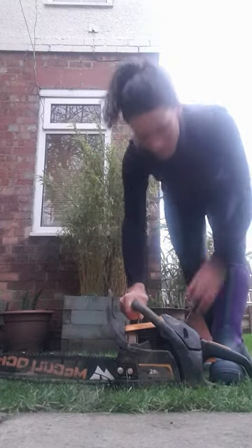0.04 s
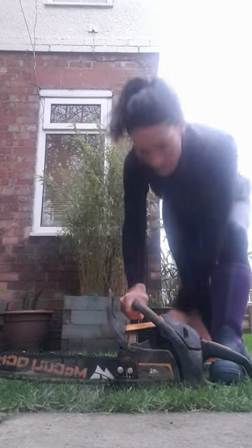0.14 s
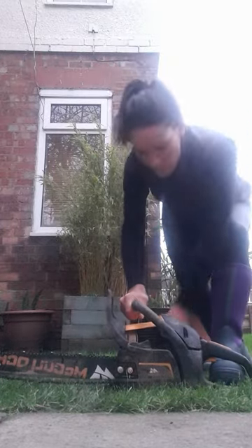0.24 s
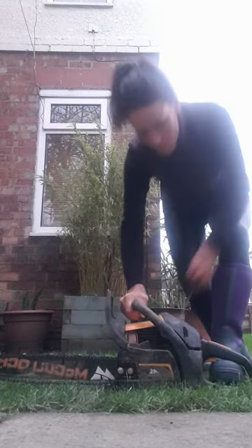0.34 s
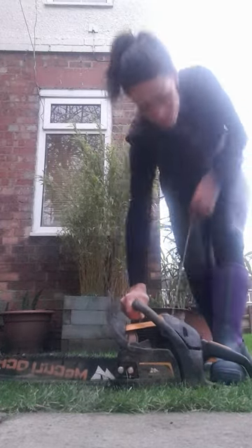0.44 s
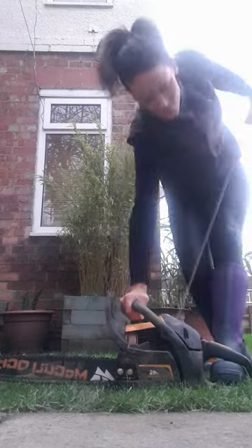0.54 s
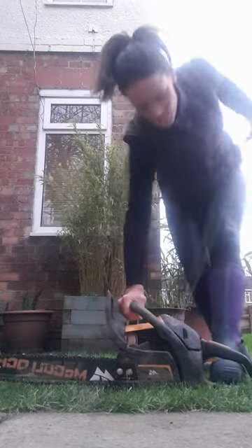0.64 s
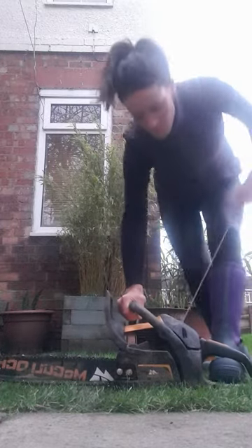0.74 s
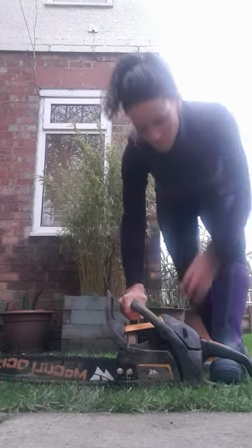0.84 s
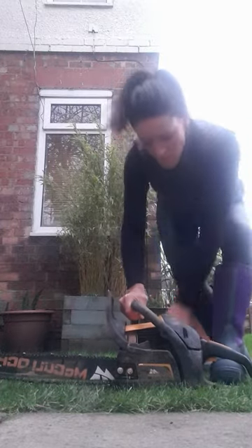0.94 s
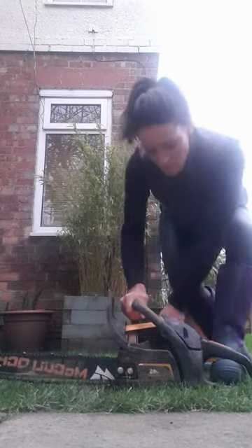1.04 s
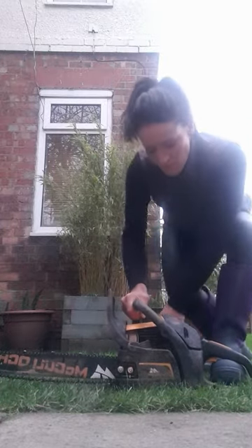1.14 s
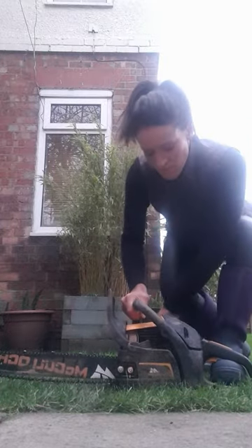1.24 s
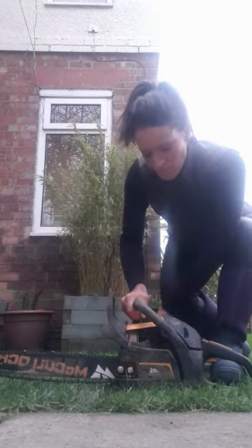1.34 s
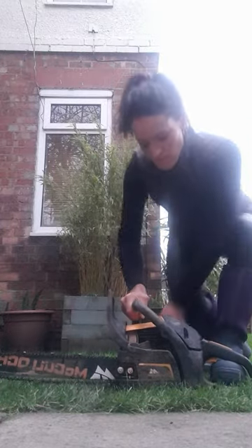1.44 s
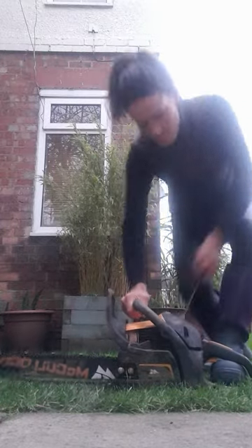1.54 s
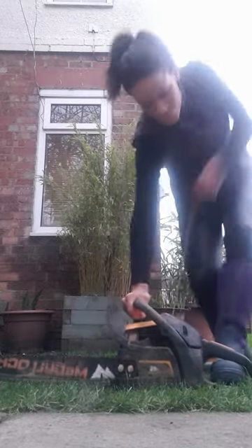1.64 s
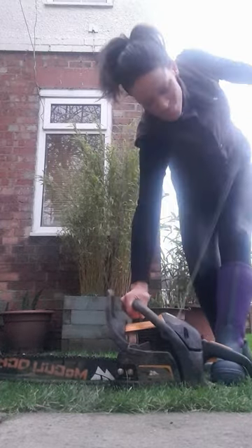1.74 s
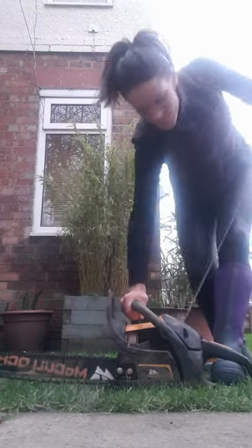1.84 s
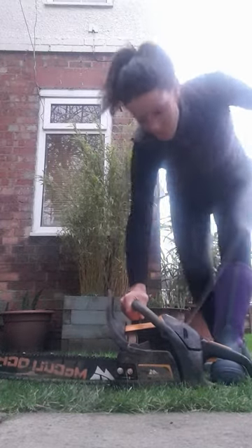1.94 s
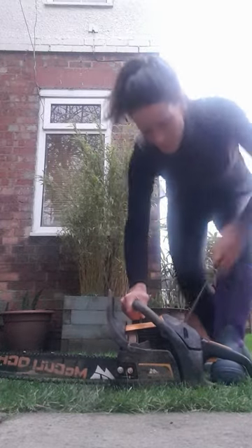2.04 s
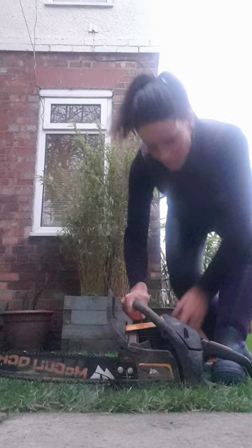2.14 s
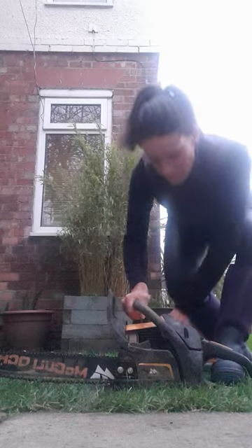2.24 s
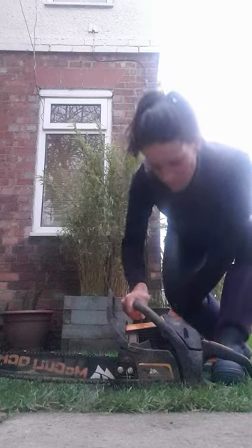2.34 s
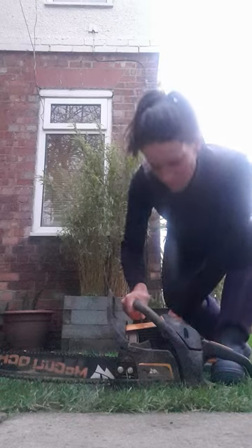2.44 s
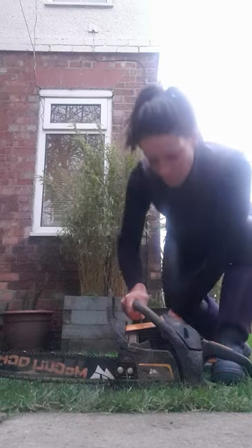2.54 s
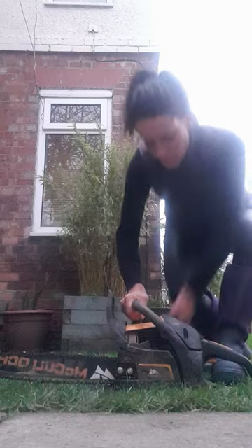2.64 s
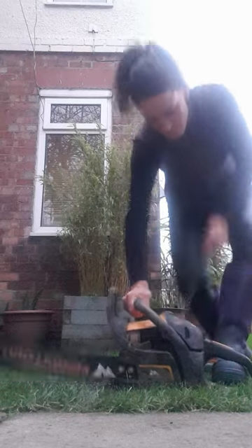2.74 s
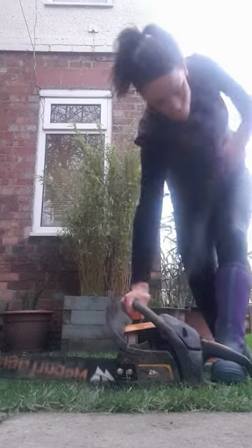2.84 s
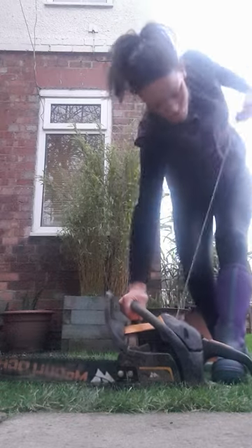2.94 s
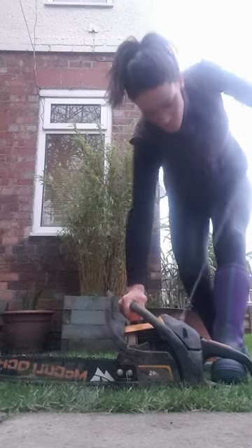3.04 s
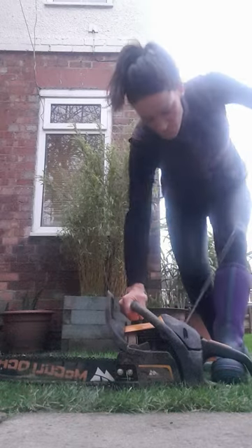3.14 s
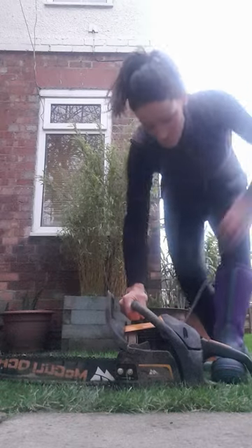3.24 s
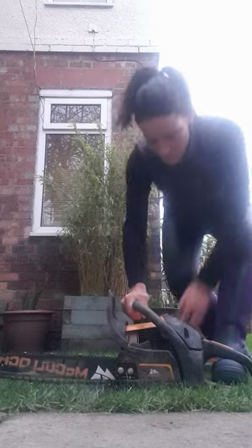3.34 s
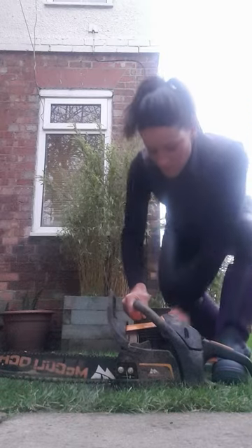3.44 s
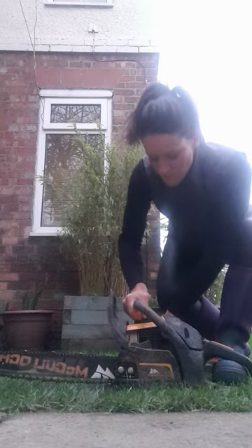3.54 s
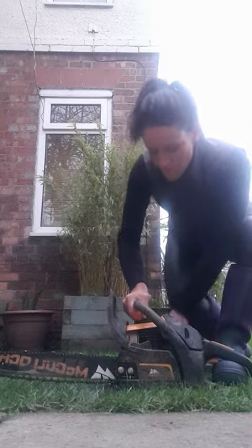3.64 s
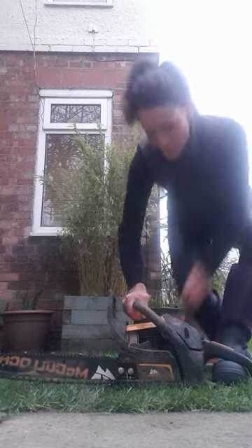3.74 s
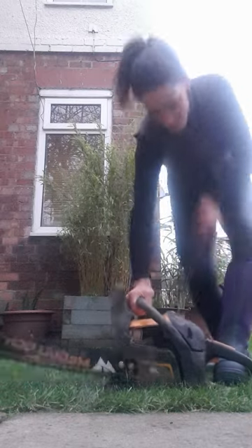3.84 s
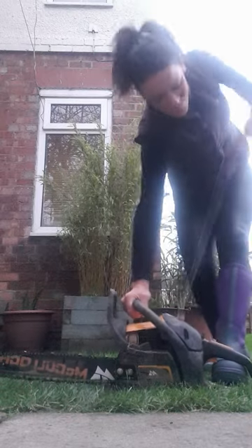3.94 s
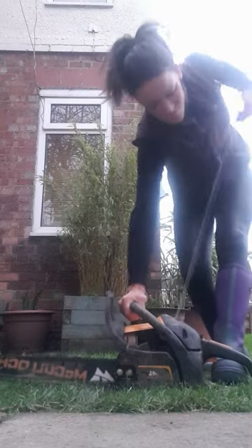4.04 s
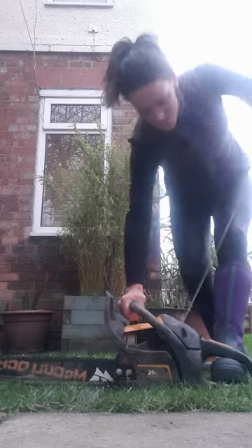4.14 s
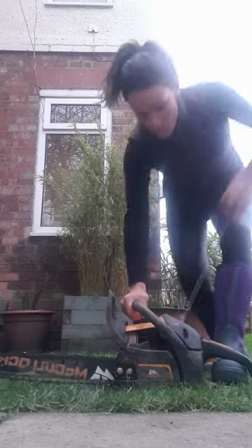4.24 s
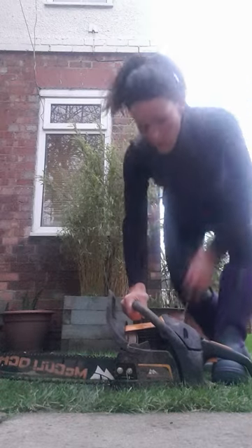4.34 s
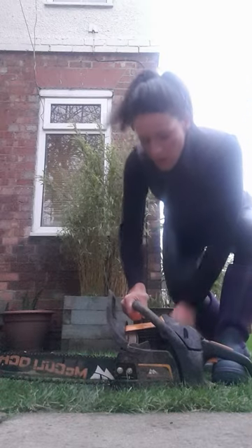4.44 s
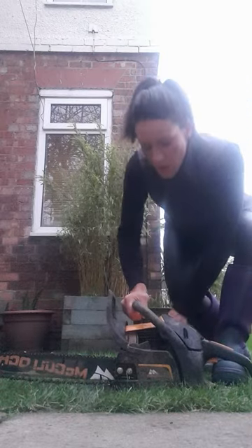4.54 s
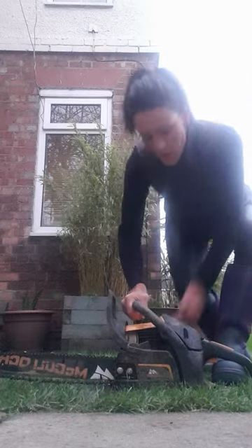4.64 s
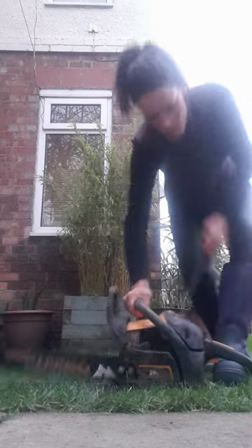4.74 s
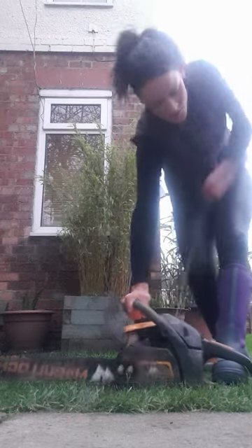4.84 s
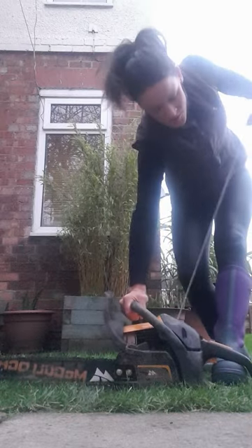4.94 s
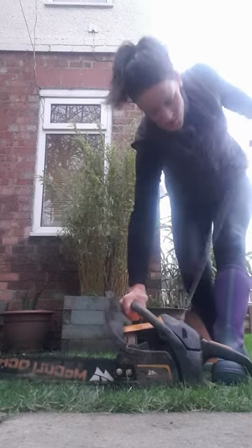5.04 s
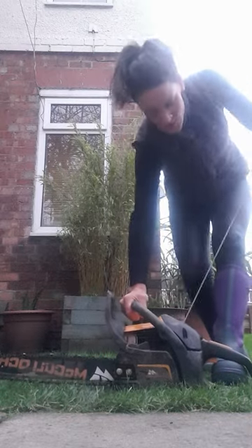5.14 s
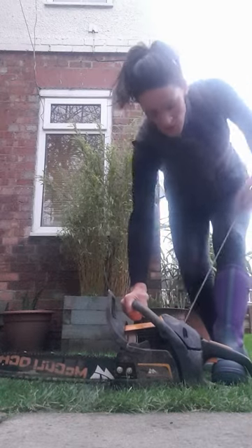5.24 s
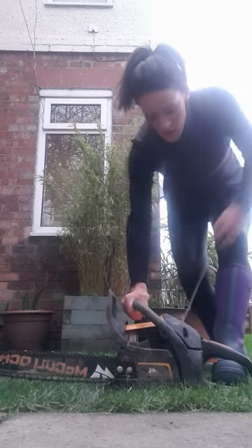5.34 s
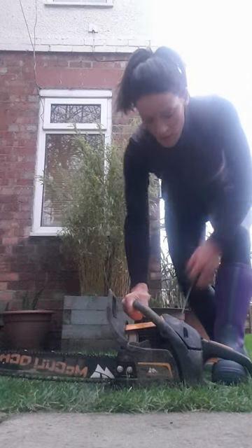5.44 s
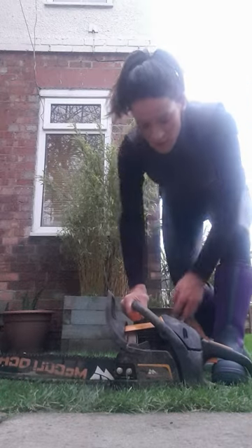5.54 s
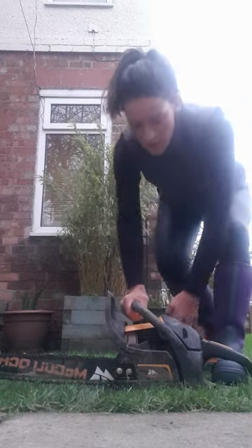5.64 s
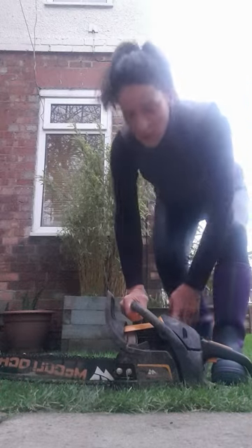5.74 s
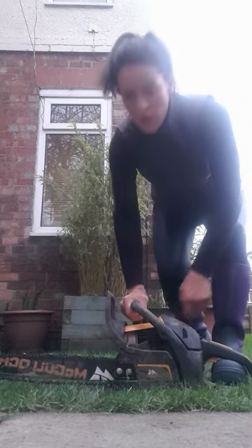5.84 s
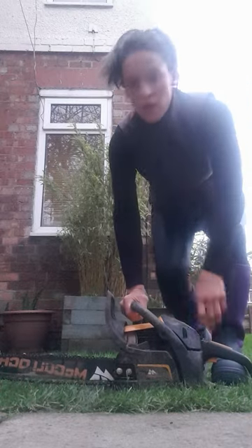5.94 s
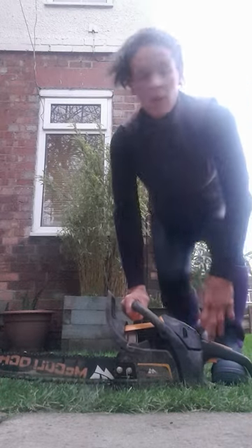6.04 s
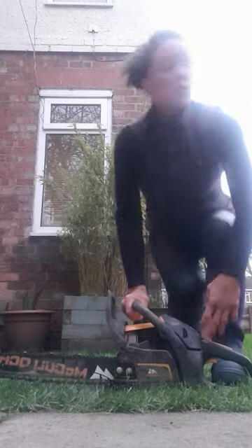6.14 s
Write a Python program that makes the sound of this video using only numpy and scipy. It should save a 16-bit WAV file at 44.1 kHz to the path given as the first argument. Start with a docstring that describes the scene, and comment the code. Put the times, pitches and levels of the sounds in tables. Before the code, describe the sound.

Close, dry outdoor sound with a faint low hum and a short thin echo from walls. At 0 to 0.2 s a cord rewind rattles out and ends with a plastic knock. The first pull hits at about 0.46 s: seven hollow, low piston chuffs, around thirty per second at first then slowing and weakening, with rope rasp and buzzing housing. A steel snap at 0.68 s starts a metallic, ratcheting rewind until 1.0 s, ending in knocks. Further pulls come at 1.65, 2.8, 3.9 and 4.87 s, the last slightly slower with six chuffs. Rewinds rattle at 1.9-2.2, 3.15-3.45, 4.2-4.5 and, softer and slower, 5.2-5.7 s. A brief rope squeak precedes the second pull; pawl clicks and hollow handle knocks punctuate the gaps, strongest near 2.25, 4.55 and 5.75 s. The engine never fires; only quiet hum remains.

```python
"""The piston of a small two-stroke chainsaw chuffs through five pulls of the starter cord and never fires.
Pressure pulses excite the air cavities and draw turbulent flow; the rope rasps and shakes the housing.
Between pulls a spring winds the cord back with a metallic rattle, as irregular contacts on resonant parts.
Pawls snap, the handle knocks on the plastic and the rope squeaks: short forces, ringing modes and sine bursts.
The yard scatters back a thin tail, over a faint outdoor hum."""
import sys
import numpy as np
from scipy import signal
from scipy.fft import rfft, irfft, next_fast_len
from scipy.io import wavfile
from scipy.ndimage import uniform_filter1d

SR = 44100
rng = np.random.default_rng(int(sys.argv[2]) if len(sys.argv) > 2 else 0)


def dump(signal):
    """Clip the signal to [-1, 1] and save it as 16-bit WAV at the path in sys.argv[1]."""
    limited = np.clip(np.atleast_2d(signal).T, -1, 1)
    pcm = np.round(limited * 32767).astype(np.int16)
    wavfile.write(sys.argv[1], SR, pcm)


N = 272529
TIME = np.arange(N) / SR

# Spectrum of the outdoor hum. Each row: frequency in Hz, relative level in dB.
GARDEN_SPECTRUM = [(18, -60), (30, -34), (48, -4.5), (106, -7.5), (134, -10.5), (260, -14.5), (345, -17),
                   (550, -17), (866, -15.5), (1350, -24.5), (2410, -37.5), (7000, -38), (9500, -55),
                   (14500, -41)]
# Squeaks of the rope in its guide. Each row: centre in seconds, length in seconds, pitch in Hz, level in dB.
ROPE_SQUEAKS = [(1.574, 0.031, 1129, -30), (1.563, .012, 2210, -21), (1.701, 0.0037, 8100, -24),
                (2.864, 0.03, 8120, -28.5), (3.984, 0.006, 7980, -27.5), (4.939, 0.011, 8000, -29)]
# Handle and cord knocking on the plastic housing. Each row: start in seconds, relative level in dB.
HANDLE_KNOCKS = [(.178, -20), (.29, -29), (.987, -21), (1.033, -25), (1.279, -44), (1.509, -31),
                 (2.244, -14), (2.701, -24), (3.16, -21), (3.501, -23), (3.768, -28), (4.536, -15),
                 (4.666, -33), (4.68, -33), (4.713, -25), (5.736, -14.5)]
# Modes of the plastic housing. Each row: frequency in Hz, level in dB, 60 dB decay time in seconds.
HOUSING_MODES = [(452, -8, .1), (640, -11, .06), (800, -8, .06), (890, -7, .06), (1030, -4, .06),
                 (1230, -7, .04), (1610, -8, .05), (2562, -17, .035), (3758, -19, .03)]
# Spectrum of a knock's crack. Each row: frequency in Hz, relative level in dB.
KNOCK_SPECTRUM = [(180, -24.5), (300, -24.5), (441, -1.5), (897, -0.5), (1050, 2), (1500, -4), (2050, -6),
                  (2720, -14), (6970, -22), (9000, -47), (11700, -124), (19800, -120)]
# Pawls snapping as a pull starts, lets go or winds home. Each row: start in seconds, relative level in dB.
PAWL_SNAPS = [(.306, -35), (.6804, -10), (1.518, -25.5), (1.8683, -12.5), (1.9734, -28), (2.6994, -15),
              (2.9965, -13.5), (3.024, -10.5), (3.1218, -21), (3.4295, -14), (3.52, -19.5), (3.7893, -25.5),
              (4.132, -9.5), (4.7122, -17), (5.054, -16.5), (5.1033, -15.5), (5.44, -17)]
# Spectrum of a snap. Each row: frequency in Hz, relative level in dB.
SNAP_SPECTRUM = [(530, -12.5), (900, 2), (1990, 4), (3520, -16), (4950, 0.5), (8150, -9), (8760, -43),
                 (9540, -2), (11200, -11), (14100, -2), (16500, -13.5)]
# Steel modes of pawls and spring. Each row: frequency in Hz, level in dB, 60 dB decay time in seconds.
STEEL_MODES = [(1720, 1, .1), (1893, 0, .1), (2010, -1, .1), (2950, -6, .1), (4113, 3.5, .17),
               (4791, 1, .13), (5270, -1, .1), (5739, 10, .14), (6944, -4, .1), (9711, 2, .17),
               (10304, 4, .1), (12180, 7.5, .18), (14295, 5, .1), (15622, 1, .14)]
# Rewinds of the cord. Each row: start in seconds, end in seconds, relative level in dB,
# sag in dB per second, pulley speed in turns per second.
REWINDS = [(-.1, 0.183, -21, 43.5, 48), (0.698, 0.987, -26, 26.5, 52), (1.916, 2.216, -26.5, 26, 48),
           (3.159, 3.456, -28.5, 13.5, 46), (4.196, 4.506, -26, 25.5, 46), (5.174, 5.599, -35, -1.5, 32),
           (5.597, 5.699, -35, 14, 42)]
# Spectrum of the pulley wobbling in the housing. Each row: frequency in Hz, relative level in dB.
RATTLE_SPECTRUM = [(41, -45), (70, -27), (135, -18.5), (231, -14.5), (326, -22), (499, -3.5), (569, -10.5),
                   (739, -10.5), (871, -11.5), (1130, -11), (1420, -10.5), (1680, -3.5), (2360, -12),
                   (2920, -16), (3500, -45), (4550, -73), (7700, -120)]
# Spectrum of the skipping pawls. Each row: frequency in Hz, relative level in dB.
RATCHET_SPECTRUM = [(1290, -24.5), (2200, -8), (3000, -10.5), (3600, -17.5), (4250, -5.5), (5070, -7.5),
                    (5600, -3), (6420, -5), (7160, -5.5), (8050, -13.5), (8800, -19.5), (10350, -3),
                    (10900, -12), (14100, -6.5), (15700, -10.5), (16500, -45.5)]
# Pulls of the cord. Each row: first compression in seconds, length of a turn at full speed in seconds,
# turns driven at full speed, drag in seconds, number of chuffs, strength in dB.
PULLS = [(.4633, .0326, 1.6, .0074, 7, 0), (1.6467, .0326, 2.3, .0134, 7, -.3),
         (2.8113, .0314, 2.66, .0104, 7, -.3), (3.9245, .0325, 2.4, .0102, 7, -.6),
         (4.874, .0377, 2.06, .0114, 6, -.4)]
# Course of the housing rumble, one row: level on the slack, at the catch, at the stroke's end, at rest, in dB.
RUMBLE_COURSE = (-44.5, -23.5, -32, -76)
# Course of the rope hiss, one row: level on the slack, at the catch, at the stroke's end, at rest, in dB.
HISS_COURSE = (-46, -29, -35, -60)
# Spectrum of the shaken housing. Each row: frequency in Hz, relative level in dB.
RUMBLE_SPECTRUM = [(240, -11.5), (400, -10.5), (471, -8.5), (565, -20.5), (635, -9.5), (735, -12.5),
                   (881, -9), (1220, -15), (1680, -17.5), (2160, -16), (3500, -30.5), (4550, -67),
                   (7700, -120)]
# Spectrum of the rope in its guide. Each row: frequency in Hz, relative level in dB.
ROPE_SPECTRUM = [(1760, -12), (3000, 1.5), (3300, -16.5), (3800, -2), (4400, -0.5), (6040, -2),
                 (8100, -4.5), (9060, -19), (11000, -7), (13600, -8), (15900, -9.5), (16500, -29.5)]
# Air resonances of crankcase and silencer. Each row: frequency in Hz, level in dB, 60 dB decay in seconds.
CAVITY_MODES = [(72, -42.5, 1), (102, -20, 0.207), (119, -5, 0.072), (192, -3, 0.066), (253.4, -18.5, 0.29),
                (338.5, -13.5, 0.11), (450, -9, 0.1), (590, -18, 0.033)]
# Spectrum of the gulped air. Each row: frequency in Hz, relative level in dB.
GULP_SPECTRUM = [(38, -65), (65, -5), (113, -13), (157, -7.5), (195, -5), (296, -16.5), (455, -14),
                 (567, -18), (633, -8), (900, -18.5), (1170, -42.5), (1980, -120)]
# Level difference of the two microphone ports. Each row: frequency in Hz, left minus right in dB.
PORT_LEAN = [(60, .8), (200, 1.8), (400, 3.2), (700, 4.5), (1100, 7.5), (1800, 7), (2800, .5), (4200, -1.2),
             (9500, -.5), (11000, -6), (13000, -20), (16000, -14)]
# Time difference of the ports. Each row: frequency in Hz, delay of the left port in seconds.
PORT_DELAY = [(300, .00013), (1700, .0001), (2000, .00022), (4500, .00016), (5500, .00025), (15000, .00022)]
# Likeness of noise on the two sides. Each row: frequency in Hz, likeness from 0 to 1.
SIDE_LIKENESS = [(100, 1), (500, 1), (1200, 0.99), (2500, 0.74), (5000, 0.15), (16000, 1)]

GARDEN_DB = -51
HOUSING_RING_DB, SPRING_RING_DB = -11, 0  # ringing excited by a knock, and by the skipping pawls
# The pulley spins up from SPIN_UP_DB below its level, and runs down when the cord is home.
SPIN_UP_S, SPIN_UP_DB, RUN_DOWN_DB_PER_S = 0.037, 22, 364
# The slack runs out, the pawls catch just before the first compression, the rope runs, then comes to rest.
SLACK_S, TAKE_UP_S, CATCH_S, GRIP_S, STROKE_S, REST_S = 0.11, 0.02, 0.0032, 0.017, 0.2, 0.4
COAST_POWER = 1.5  # a coasting turn falls behind by drag * (turns coasted) ** COAST_POWER
CHUFF_DB, CHUFF_LOSS_DB = -5.5, 7.5  # at the first compression, and the loss by STROKE_S
CUTOFF_HZ = 15950


def from_db(db):
    """Decibels are a logarithmic measure of amplitude: convert them to gain."""
    return 10 ** (np.asarray(db) / 20)


def rms_one(x):
    """The root mean square measures level: scale it to 1."""
    return x / np.sqrt(np.mean(x ** 2) + 1e-20)


def at_hz(points, hz):
    """A spectrum is read by interpolation on a logarithmic frequency axis."""
    f, value = np.transpose(points)
    return np.interp(np.log(hz + 1), np.log(f), value)


def colour(x, db_at):
    """Causality: a folded cepstrum gives the minimum-phase filter with gain db_at(Hz)."""
    size = 2 * next_fast_len(N // 2 + 8192)
    hz = np.arange(size // 2 + 1) * SR / size
    cepstrum = irfft(np.log(from_db(db_at(hz)) + 1e-6))
    cepstrum[1:size // 2] *= 2
    cepstrum[size // 2 + 1:] = 0
    response = np.exp(rfft(cepstrum))
    return irfft(rfft(x, size) * response)[..., :N]


def radiate(force, spectrum):
    """Partial coherence: a rough force through a body sounds partly unlike on both sides, near its own level."""
    def shape(hz):
        level = at_hz(spectrum, hz)
        return level - 10 * np.log10(np.mean(from_db(level) ** 2))

    def share(hz, sign):
        likeness = np.clip(at_hz(SIDE_LIKENESS, hz), 0, .995)
        return 10 * np.log10((1 + sign * likeness) / 2)

    mid = colour(force * rng.standard_normal(N), lambda hz: shape(hz) + share(hz, 0.77))
    side = colour(force * rng.standard_normal(N), lambda hz: shape(hz) + share(hz, -1))
    return np.array([mid + side, mid - side])


def drift(rate):
    """Random modulation: rate chance values per second, joined by lines, with rms 1."""
    knots = rng.standard_normal(16000)
    return rms_one(np.interp(TIME * rate, np.arange(len(knots)), knots))


def ring(force, hz, t60):
    """Damped resonance: a unit click sets a decaying sine of initial height 1 ringing."""
    radius = from_db(-60 / (t60 * SR))
    angle = 2 * np.pi * hz / SR
    poles = [1, -2 * radius * np.cos(angle), radius * radius]
    return signal.lfilter([0, np.sin(angle)], poles, force + 1e-18)


def fade(clicks, t60):
    """Exponential decay: each click starts an envelope that loses 60 dB in t60 seconds."""
    return signal.lfilter([1], [1, -from_db(-60 / (t60 * SR))], clicks + 1e-18)


def strikes(rows, scatter_db=0):
    """Impulsive excitation: one click per row of seconds and dB."""
    s, db = np.transpose(rows)
    clicks = np.zeros(N)
    clicks[(s * SR).astype(int)] = from_db(db + scatter_db * rng.standard_normal(len(s)))
    return clicks


def delayed(x, seconds):
    """Time shift: the same signal later, or earlier if seconds is negative."""
    return np.interp(TIME - seconds, TIME, x, left=0, right=0)


def shell(x, share, t60):
    """High modal density: the casing's many close modes prolong contacts and colour them with fixed peaks."""
    t = TIME[:SR // 5]
    modes = rng.standard_normal(len(t)) * from_db(-60 * t / t60)
    modes /= np.sqrt(np.sum(modes ** 2))
    prolonged = signal.fftconvolve(x, modes[None], axes=1)[:, :N]
    return np.sqrt(1 - share) * x + np.sqrt(share) * prolonged


def steel(force):
    """Modal synthesis: small steel parts ring under a rough force, differently towards each side."""
    hits = force * rng.standard_normal((2, N))
    return sum(from_db(db) * ring(hits, hz, t60) for hz, db, t60 in STEEL_MODES) / np.sqrt(SR)


def garden():
    """Broadband background: filtered noise with a slowly wavering level makes the outdoor hum."""
    return radiate(from_db(GARDEN_DB + 1.0 * drift(4.06)), GARDEN_SPECTRUM)


def yard(x, echo_db=-15, t60=0.3, first_s=0.0087):
    """Diffuse reflection: wall and fences scatter back a short, thin tail."""
    t = TIME[:SR // 2]
    tail = rng.standard_normal((2, len(t))) * from_db(-60 * t / t60) * (t > first_s)
    tail /= np.sqrt(np.sum(tail ** 2, axis=1, keepdims=True))
    thin = signal.sosfilt(signal.butter(2, 350, "high", fs=SR, output="sos"), x)
    return x + from_db(echo_db) * signal.fftconvolve(thin, tail, axes=1)[:, :N]


def squeaks(waver=.06):
    """Stick-slip friction: the taut rope gives brief tones of unsteady pitch."""
    out = np.zeros(N)
    for s, length, hz, db in ROPE_SQUEAKS:
        phase = 2 * np.pi * np.cumsum(hz * (1 + waver * drift(hz / 4))) / SR
        swell = np.exp(-np.minimum((2 * (TIME - s) / length) ** 2, 50))
        out += from_db(db) * np.sqrt(2) * swell * np.sin(phase)
    return out


def handle(crack_db=-3):
    """Impact: a knock gives a short noisy crack and excites the hollow modes of the housing."""
    crack = radiate(fade(strikes(HANDLE_KNOCKS), t60=.075), KNOCK_SPECTRUM)
    body = 0
    for k, (hz, db, t60) in enumerate(HOUSING_MODES):
        sign = (-1) ** k  # neighbouring modes start in opposite phase
        body = body + sign * from_db(db) * ring(strikes(HANDLE_KNOCKS, scatter_db=2.5), hz, t60)
    return from_db(crack_db) * crack + from_db(HOUSING_RING_DB) * body


def pawls(snap_db=-6, ring_db=-8):
    """Impact of steel on steel: a pawl snaps against the flywheel and rings."""
    force = fade(strikes(PAWL_SNAPS), t60=0.044)
    return from_db(snap_db) * radiate(force, SNAP_SPECTRUM) + from_db(ring_db) * steel(force)


def pulley():
    """Rotation under a spring: gain and turns per second as the pulley spins up, sags and runs down."""
    gain = 0
    for start, end, db, sag, _ in REWINDS:
        rise = SPIN_UP_DB * np.minimum((TIME - start) / SPIN_UP_S - 1, 0)
        fall = sag * np.clip(TIME - start, 0, end - start)
        fall = fall + RUN_DOWN_DB_PER_S * np.maximum(TIME - end, 0)
        gain = gain + from_db(db + rise - fall)
    table = np.array(REWINDS)
    turns_per_s = np.interp(TIME, table[:, :2].ravel(), np.repeat(table[:, -1], 2))
    return gain, turns_per_s


def chatter(per_s, uneven, scatter_db, t60, rub):
    """Intermittent contact: uneven clicks over steady rubbing form a force of rms 1."""
    count = np.cumsum(per_s * np.exp(uneven * drift(np.mean(per_s)))) / SR
    strength = from_db(scatter_db * np.clip(rng.standard_normal(N), -2, 2))
    clicks = np.diff(np.floor(count), prepend=0) * strength
    return rms_one(rms_one(fade(clicks, t60)) + rub)


def rewind(rattle_db=2.0, ratchet_db=0.0, coupling=0.35, tick_share=.5, tick_db=14):
    """Coupled contacts: each wobble of the pulley presses the skipping pawls harder; some tick sharply."""
    gain, turns_per_s = pulley()
    wobble = chatter(per_s=1.8 * turns_per_s, uneven=.35, scatter_db=2.2, t60=.022, rub=.3)
    ratchet = chatter(per_s=3.6 * turns_per_s, uneven=.4, scatter_db=2.8, t60=.025, rub=.4)
    ticks = rng.random(N) < tick_share * turns_per_s / SR  # tick_share: mean ticks per turn
    skips = gain * rms_one(wobble ** coupling * ratchet)
    skips = skips + gain * from_db(tick_db) * fade(ticks, t60=0.0047)
    contacts = from_db(rattle_db) * radiate(gain * wobble, RATTLE_SPECTRUM)
    contacts = contacts + from_db(ratchet_db) * radiate(skips, RATCHET_SPECTRUM)
    return shell(contacts, share=0.64, t60=0.044) + from_db(SPRING_RING_DB) * steel(skips)


def chuffs():
    """Drive and drag: one compression per turn, even while driven, then ever later; rows of seconds and dB."""
    rows = []
    for start, turn_s, driven, drag_s, count, db in PULLS:
        turn = np.arange(round(count))
        since = turn * turn_s + drag_s * np.maximum(turn - driven, 0) ** COAST_POWER
        level = CHUFF_DB + db - CHUFF_LOSS_DB * (since / STROKE_S) ** 3
        rows.append(np.c_[start + since, level])
    return np.vstack(rows)


def stroke_gain(levels_db):
    """Phases of a stroke: the slack is taken up quietly, a jump at the catch, a steady sag, then rest."""
    slack, caught, spent, rest = levels_db
    course_s = [-SLACK_S - TAKE_UP_S, -SLACK_S, -CATCH_S - GRIP_S, -CATCH_S, STROKE_S, STROKE_S + REST_S]
    course_db = [rest, slack, slack, caught, spent, rest]
    gain = 0
    for start, *_, db in PULLS:
        level = np.interp(TIME - start, course_s, course_db, left=-np.inf, right=-np.inf)
        gain = gain + from_db(db + level)
    return gain


def pull(rumble_db=3.0, rope_db=1, judder_db=3, rasp_db=2.5, shake=0.49):
    """Friction and forced vibration: the rope rasps in its guide while every turn shakes the housing."""
    jolt = fade(strikes(chuffs()), t60=0.21)
    throb = (jolt + 0.14) / (uniform_filter1d(jolt, size=2000) + 0.025)  # jolt against its local mean
    throb = np.clip(throb, 1e-3, None) ** shake
    judder = rms_one(from_db(judder_db * drift(250)))
    rasp = rms_one(from_db(rasp_db * drift(300)))
    housing = radiate(stroke_gain(RUMBLE_COURSE) * throb * judder, RUMBLE_SPECTRUM)
    rope = radiate(stroke_gain(HISS_COURSE) * rasp, ROPE_SPECTRUM)
    return from_db(rumble_db) * housing + from_db(rope_db) * rope


def piston(rise_s=0.0006, fall_s=0.00022, spike_db=2.5, ring_db=1, gulp_db=-16, gulp_t60=0.17,
           intake_lead_s=0.0089, intake_db=-14, return_db=-16):
    """Pulse excitation: the port opens with a pressure spike, cavities suck back and ring, turbulent air gulps."""
    t = np.arange(-200, 201) / SR
    puff = np.exp(-.5 * (t / np.where(t < 0, rise_s, fall_s)) ** 2)
    s, db = chuffs().T
    period = np.minimum(np.diff(s, append=np.inf), .06)
    # weaker puffs: the intake just before the spike, and the return stroke near half a turn later
    intake = np.c_[s - period * rng.normal(.15, .015, len(s)), db + intake_db]
    back = np.c_[s + period * rng.normal(.5, .08, len(s)), db + return_db]
    puffs = np.vstack([chuffs(), intake, back])
    spike = np.convolve(strikes(puffs), puff, "same")
    rings = sum(from_db(level) * ring(strikes(puffs, scatter_db=0.5), hz, t60)
                for hz, level, t60 in CAVITY_MODES)
    rings = np.convolve(rings, puff / puff.sum(), "same")
    flow = delayed(fade(strikes(chuffs()), gulp_t60), -intake_lead_s)
    gulp = radiate(flow, GULP_SPECTRUM)
    return from_db(spike_db) * spike - from_db(ring_db) * rings + from_db(gulp_db) * gulp


def scene():
    """Superposition: the saw and its reflections in the yard add to the outdoor hum."""
    starter = shell(pull(), share=0.55, t60=0.014) + rewind() + pawls() + handle() + squeaks()
    return yard(piston() + starter) + garden()


def record(dry):
    """Interaural-like differences: the left port hears later, fuller in the middle, duller on top; peaks round."""
    size = next_fast_len(N + 4096)
    hz = np.arange(size // 2 + 1) * SR / size
    side = np.array([[.5], [-.5]])  # half of each difference to either port
    lean = from_db(side * at_hz(PORT_LEAN, hz))
    lean = lean / np.sqrt(np.mean(lean ** 2, axis=0))
    lag = np.exp(-2j * np.pi * hz * side * at_hz(PORT_DELAY, hz))
    ports = irfft(rfft(dry, size) * lag * lean, size)[:, :N]
    ports = signal.sosfilt(signal.butter(2, 32, "high", fs=SR, output="sos"), ports)
    ports = 1.05 * np.tanh(ports / 1.05)
    return signal.sosfilt(signal.ellip(12, .1, 80, CUTOFF_HZ, fs=SR, output="sos"), ports)


dry = scene()
out = record(dry)
dump(out)
```